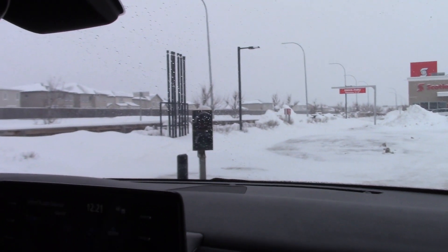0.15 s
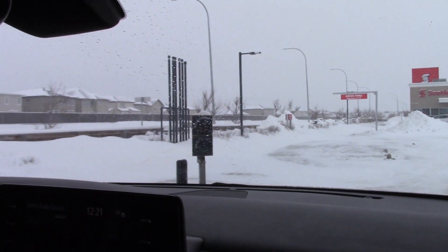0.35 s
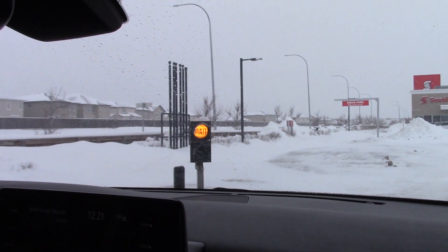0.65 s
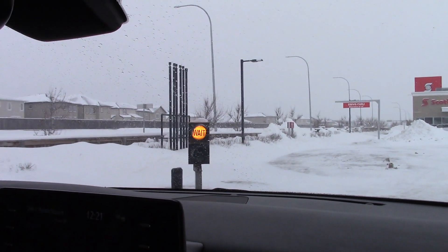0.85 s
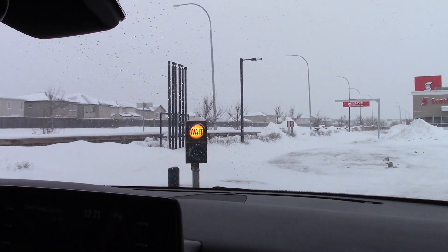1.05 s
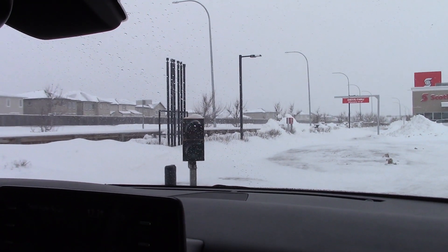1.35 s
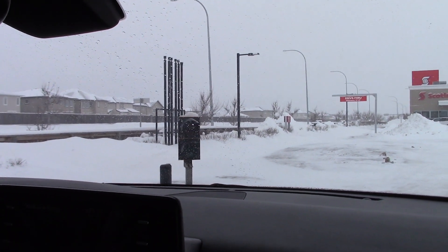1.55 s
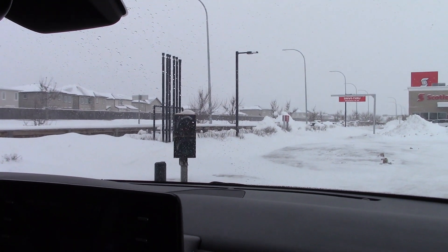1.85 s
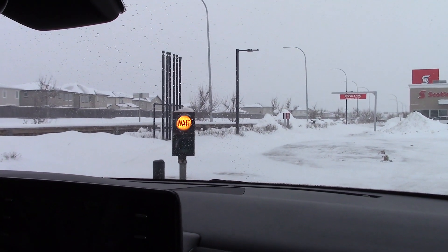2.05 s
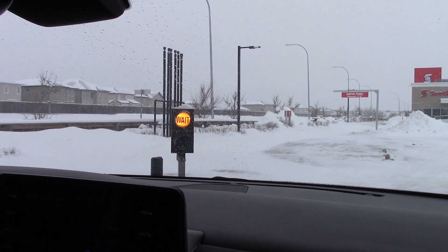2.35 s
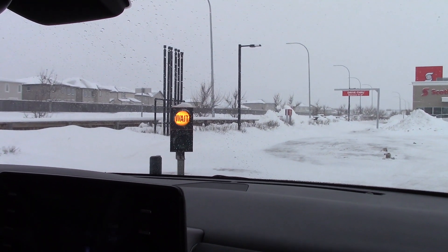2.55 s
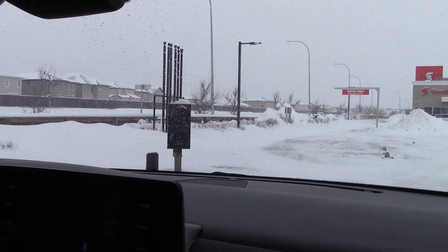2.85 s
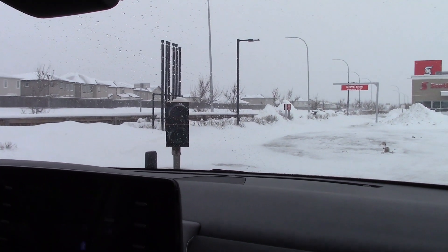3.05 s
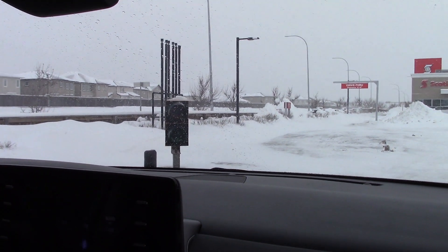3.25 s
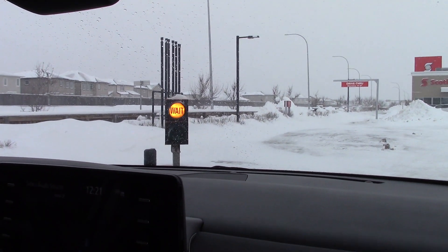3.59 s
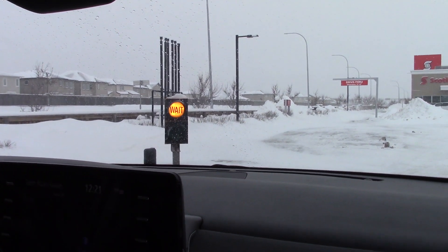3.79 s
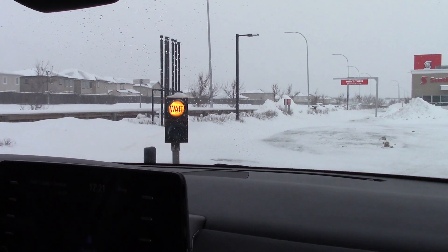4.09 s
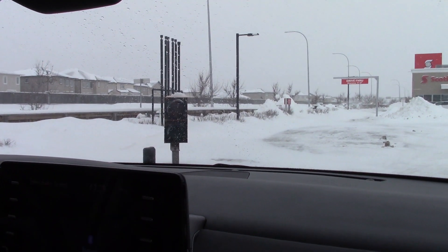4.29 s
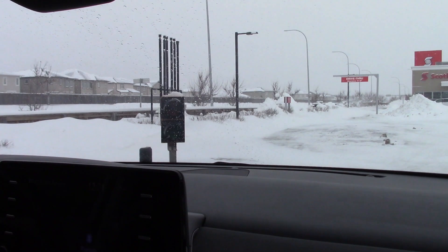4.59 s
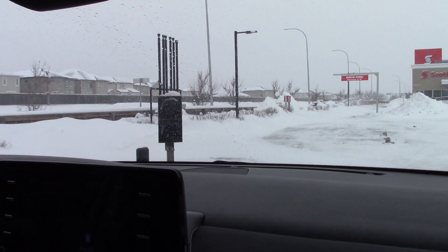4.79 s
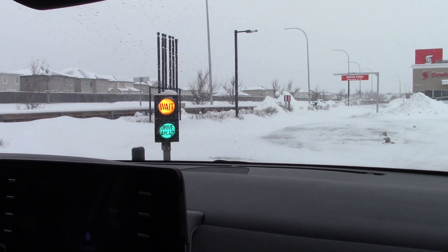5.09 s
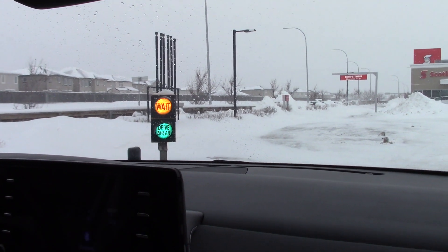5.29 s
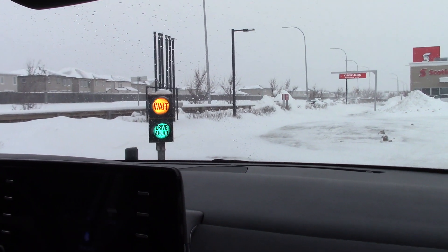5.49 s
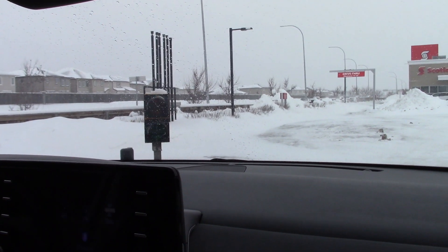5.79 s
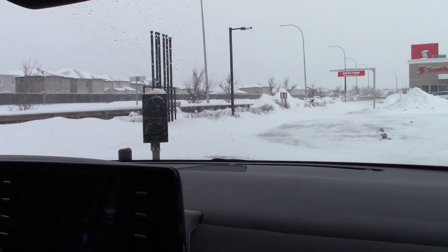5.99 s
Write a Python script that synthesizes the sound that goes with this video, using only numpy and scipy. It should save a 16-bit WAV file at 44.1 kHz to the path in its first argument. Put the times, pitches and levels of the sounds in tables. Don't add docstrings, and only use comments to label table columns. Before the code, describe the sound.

A steady, loud rush of blower air surrounds a sealed car cabin, captured at the dashboard. Low boom and thick panel roar dominate, with softer air hiss above. A breathy high whistle from a seal gap fades within the first two seconds. The fan's steady-pitched drone comes and goes, a thin motor whine surfaces faintly, and sparse water specks tick on the windshield.

```python
import sys
import numpy as np
from scipy import signal
from scipy.fft import rfft, irfft
from scipy.io import wavfile
from scipy.ndimage import uniform_filter1d, minimum_filter1d

SR = 44100
rng = np.random.default_rng(int(sys.argv[2]) if len(sys.argv) > 2 else 0)


def materialize(psi):
    bounded = np.clip(np.atleast_2d(psi).T, -1, 1)
    quanta = np.round(bounded * 32767).astype(np.int16)
    wavfile.write(sys.argv[1], SR, quanta)


def natural_amplitude(level_db):
    exponent = np.asarray(level_db, float) / 20
    return 10 ** exponent


N = 270774


def evened(x):
    return x / np.sqrt(np.mean(np.abs(x) ** 2) + 1e-20)


def read(points, hz):
    f, value = np.transpose(points)
    return np.interp(np.log(hz + 1), np.log(f + 1), value)


def drift(count, width):
    steps = np.arange(-300, 301)
    bell = np.exp(-(steps / width) ** 2)
    return evened(np.convolve(rng.standard_normal(count), bell, "same"))


def swells(rows, t):
    return sum(height * np.exp(-((t - middle) / half) ** 2) for middle, height, half in rows)


def creep(t, start_db, db_per_s):
    return start_db + db_per_s * t


# (frequency [Hz], width [Hz], lift [dB])
CABIN_MODES = [(112, 13, 8.5), (154, 14, 4.5), (255, 30, 1.5), (346, 19, 8), (435, 16, 6.5), (725, 50, 4),
               (912, 90, 4), (1178, 80, 6.5), (1765, 25, 3.5), (2600, 300, 1)]
# (frequency [Hz], level [dB])
PORT_DIFFERENCE = [(60, -44.5), (94, -47), (150, -41.5), (230, -30.5), (360, -35), (570, -28), (900, -30.5),
                   (1410, -31.5), (2210, -27), (3470, -26), (8000, -23)]


def turbulence(shape, size, patchy_db, gusty_db, gust_s):
    hop = size // 4
    frames = N // hop + 700
    hz = np.fft.rfftfreq(size, 1 / SR)
    a, b, c, d, patches = rng.standard_normal((frames, len(hz), 5)).T
    patches = uniform_filter1d(patches, size // 48, 0)
    patches = evened(uniform_filter1d(patches, 2800 // hop, 1))
    quick_eddies = drift(frames, gust_s * SR / hop)
    slow_eddies = drift(frames, 5 * gust_s * SR / hop)
    gusts = quick_eddies + 0.8 * slow_eddies
    cabin_db = sum(db / (1 + (2 * (hz - f) / width) ** 2) for f, width, db in CABIN_MODES)
    colour = natural_amplitude(read(shape, hz) + cabin_db)[:, None]
    difference = natural_amplitude(read(PORT_DIFFERENCE, hz))[:, None]
    z = np.array([a + 1j * b, (c + 1j * d) * difference])
    z *= colour * natural_amplitude(patchy_db * patches + gusty_db * gusts)
    x = signal.istft(z, nperseg=size, noverlap=size - hop)[1][:, size:size + N]
    return x / np.std(x[0])


def rotor_tone(rows, rest_db, hz, waver, flutter_db):
    t = np.arange(N) / SR
    eddy_times = np.linspace(0, t[-1], 2000)
    wobble = np.interp(t, eddy_times, drift(2000, 8.0))
    flutter = np.interp(t, eddy_times, drift(2000, 8.0))
    swelling = swells([(middle, natural_amplitude(db), half) for middle, db, half in rows], t)
    level = (natural_amplitude(rest_db) + swelling) * natural_amplitude(flutter_db * flutter)
    return np.sqrt(2) * level * np.sin(2 * np.pi * hz * t + waver * wobble)


# (middle [s], level [dB], colour [Hz], half length [s])
SPRAY_PUFFS = [(0.143, -45, 6060, .005), (0.195, -49, 5840, 0.011), (0.251, -47, 5960, 0.0065),
               (0.39, -50, 4930, .008), (0.637, -46.5, 6060, .008), (.689, -34, 8300, .0011),
               (0.75, -54.5, 6120, .015), (1.038, -38, 5500, .01), (1.053, -43, 4940, 0.012),
               (1.352, -48, 7100, 0.0065), (1.879, -41, 5060, 0.0082), (1.913, -46.5, 8460, .006),
               (2.053, -50.5, 6940, .008), (2.133, -54.5, 6820, 0.016), (2.878, -48, 5750, 0.0032),
               (3.217, -51.5, 5870, 0.011), (3.265, -48.5, 5970, .005), (3.353, -50, 8400, 0.0055),
               (3.637, -54, 7200, .015), (4.509, -48, 5930, .007), (4.607, -49.5, 9100, .003),
               (4.661, -47, 6060, 0.0067), (4.873, -48.5, 5950, .005), (5.109, -56, 8080, .006),
               (5.205, -47, 5900, 0.0055), (5.701, -50, 8440, .004), (5.736, -53.5, 7770, 0.0056)]


def drops_on_glass():
    size = 4096
    out = np.zeros(N + size)
    t = (np.arange(size) - size // 2) / SR
    band = np.fft.rfftfreq(size, 1 / SR)
    noises = rng.standard_normal((len(SPRAY_PUFFS), size))
    for (middle, db, hz, half), noise in zip(SPRAY_PUFFS, noises):
        octaves = np.log2((band + 1) / hz)
        colour_db = -11.0 * octaves ** 2 - 5.0 * np.maximum(octaves, 0)
        puff = evened(irfft(rfft(noise) * natural_amplitude(colour_db)))
        at = round(middle * SR)
        out[at:at + size] += natural_amplitude(db) * puff * np.exp(-(t / half) ** 2)
    return out[size // 2:size // 2 + N]


# (frequency [Hz], density [dB per Hz])
GAP_COLOUR = [(2100, -40), (2520, -9), (2630, 0), (2740, -9), (3200, -40)]


def singing_seal(t):
    start_db, rest_db, leave_s = -35.5, -44, 0.9
    gap = turbulence(GAP_COLOUR, size=512, patchy_db=-0.3, gusty_db=-1.0, gust_s=0.014)
    level_db = rest_db + (start_db - rest_db) * np.exp(-(t / leave_s) ** 2)
    return gap * natural_amplitude(level_db)


# (frequency [Hz], density [dB per Hz])
HISS_COLOUR = [(700, -17.5), (1100, -7.5), (1500, -4), (2000, -5.5), (2600, -8.5), (3400, -11.5),
               (4200, -18), (5200, -22.5), (7000, -28.5), (10000, -40.5), (13000, -53), (15700, -66.5),
               (20000, -77.5)]
# (middle [s], lift [dB], negative in a lull, half length [s])
SEAL_GUSTS = [(.08, 0, 0.076), (.24, 2.5, 0.072), (.39, 4, 0.017), (.78, 2.5, .06), (1.12, 2, 0.027),
              (1.87, 3, 0.014), (2.1, 4, 0.043), (2.4, 0, 0.027), (2.62, 1.5, 0.021), (3.22, 6.5, 0.011),
              (3.3, 3, .04), (3.63, 2.5, 0.055), (4.05, 1, 0.048), (4.26, 2.5, 0.044), (4.5, 3.5, 0.012),
              (4.67, 1.5, 0.089), (4.87, 1.5, 0.016), (4.9, 1, 1), (5.2, 0, 0.026), (5.56, 3, 0.051),
              (1.4, -0.5, 0.31), (5.12, 1, 0.076), (5.72, 1.5, 0.019), (5.78, -4.5, 0.02),
              (5.95, 1.5, 0.054)]


def seal_hiss(t):
    hiss = turbulence(HISS_COLOUR, size=512, patchy_db=0.5, gusty_db=0.25, gust_s=0.018)
    treble = signal.butter(1, [4000., 11000.], "bandpass", fs=SR, output="sos")
    top = signal.sosfiltfilt(treble, hiss)
    hiss = hiss + (natural_amplitude(creep(t, start_db=3.4, db_per_s=-0.73)) - 1) * top
    return hiss * natural_amplitude(creep(t, start_db=-28, db_per_s=0.072) + swells(SEAL_GUSTS, t))


# (middle [s], level [dB], half length [s])
WHINE_SWELLS = [
    (.6, -40, 0.12),
    (1.17, -36, 0.24),
    (1.47, -39, .05),
    (2.15, -39.5, .1),
    (3.1, -40, .3),
    (4.2, -47, 0.54),
    (5.5, -40, 0.13),
    (5.95, -37.5, .1),
]


def motor_whine():
    return rotor_tone(WHINE_SWELLS, rest_db=-53.5, hz=1500.8, waver=0.27, flutter_db=-2.5)


# (middle [s], level [dB], half length [s])
BLADE_SWELLS = [
    (.15, -22.5, 0.2),
    (.9, -28.5, 0.22),
    (1.75, -32.5, 0.19),
    (2.45, -18.5, 0.23),
    (2.95, -22.5, .25),
    (3.55, -43, 0.16),
    (3.95, -20.5, 0.53),
    (4.9, -18, .2),
    (5.35, -19, 0.42),
    (5.95, -19, 0.3),
]


def blade_tone():
    return rotor_tone(BLADE_SWELLS, rest_db=-31, hz=589.2, waver=0.4, flutter_db=2.2)


# (frequency [Hz], density [dB per Hz])
BOOM_COLOUR = [(14, -49), (24, -18), (65, -8.5), (105, 0.5), (150, 2), (183, -14), (240, -2), (310, -24),
               (530, -120)]


def cabin_boom(t):
    rumble = turbulence(BOOM_COLOUR, size=4096, patchy_db=0.4, gusty_db=0.3, gust_s=0.05)
    return rumble * natural_amplitude(creep(t, start_db=-14.5, db_per_s=-0.66))


# (frequency [Hz], density [dB per Hz])
ROAR_COLOUR = [(88, -34), (150, -10), (198, -4.5), (350, -1), (450, -3.5), (525, -8), (584, -6.5),
               (649, -13), (900, -17), (1320, -27.5), (1500, -37), (1950, -49), (3300, -120)]


def dryer_roar(t):
    roar = turbulence(ROAR_COLOUR, size=4096, patchy_db=0.6, gusty_db=-0.25, gust_s=0.05)
    return roar * natural_amplitude(creep(t, start_db=-9, db_per_s=-0.02))


def scene():
    t = np.arange(N) / SR
    spray = drops_on_glass()
    mid, side = singing_seal(t) + seal_hiss(t) + cabin_boom(t) + dryer_roar(t)
    mid = mid + motor_whine() + blade_tone()
    return np.array([mid + side + 1.5 * spray, mid - side + 1.3 * spray])


def roll_off(x):
    return signal.sosfilt(signal.butter(12, 15720, fs=SR, output="sos"), x)


def record(dry):
    low_cut = signal.butter(2, 32., "highpass", fs=SR, output="sos")
    hot = natural_amplitude(1.0) * signal.sosfilt(low_cut, dry)
    ceiling = 0.92
    over_db = np.maximum(20 * np.log10(np.abs(hot).max(0) / ceiling + 1e-9), 0)
    fall = np.arange(N) * 280.0 / SR
    held_db = np.maximum.accumulate(over_db + fall) - fall
    look = 129
    held_db = -minimum_filter1d(-held_db, size=look)
    window = np.blackman(look)
    smooth_db = signal.oaconvolve(held_db, window / window.sum(), "same")
    treble_loss = signal.butter(2, 13300., fs=SR, output="sos")
    finished = signal.sosfilt(treble_loss, hot / natural_amplitude(smooth_db))
    return roll_off(finished)


dry = scene()
out = record(dry)
materialize(out)
```